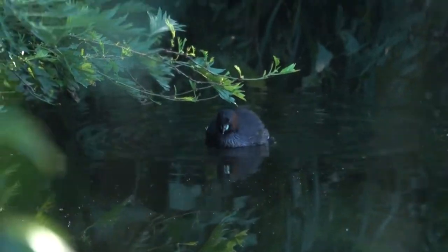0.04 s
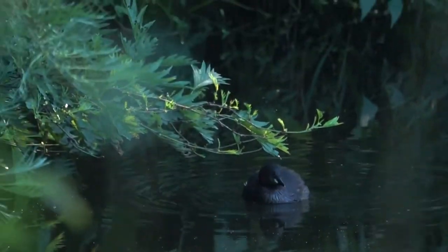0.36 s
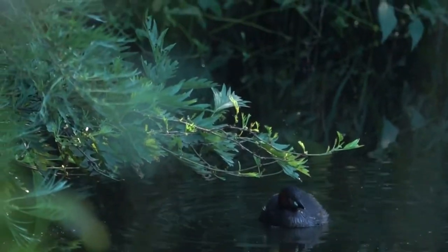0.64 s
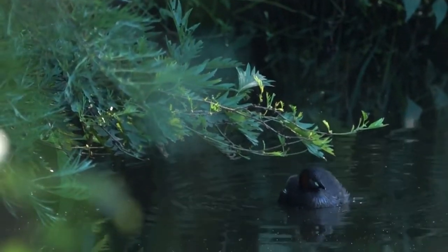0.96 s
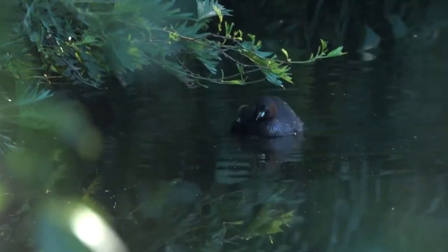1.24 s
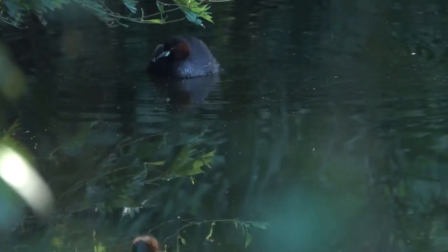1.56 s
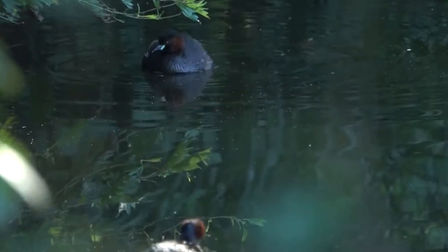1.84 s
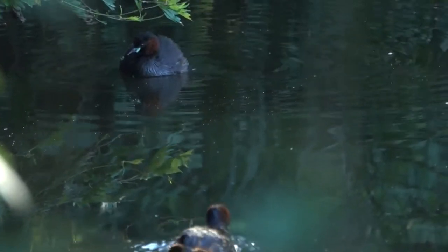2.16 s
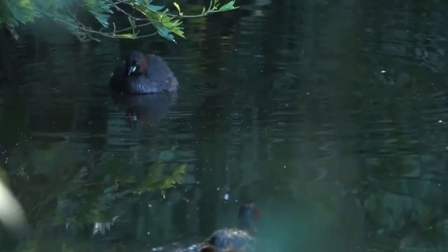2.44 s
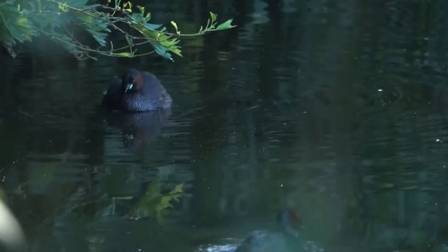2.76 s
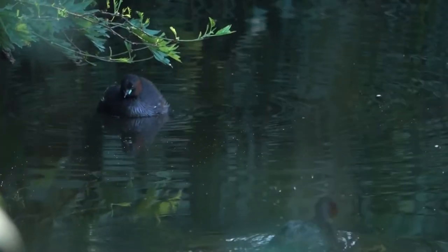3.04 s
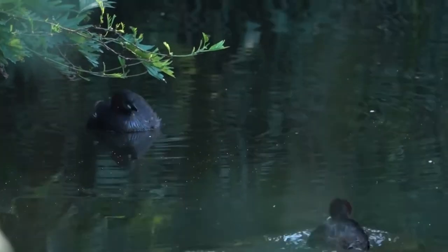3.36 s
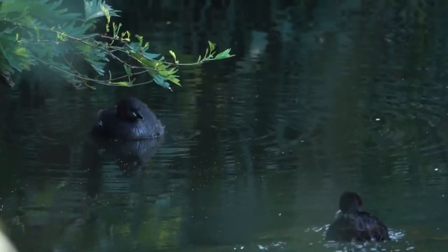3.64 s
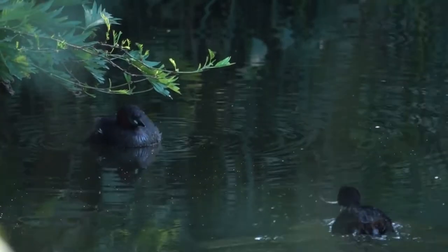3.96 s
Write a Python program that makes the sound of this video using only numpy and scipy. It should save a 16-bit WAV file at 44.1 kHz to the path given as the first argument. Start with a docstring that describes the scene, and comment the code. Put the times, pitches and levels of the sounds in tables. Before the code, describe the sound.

Rapid, shrill trill of a small water bird fading, then thin chirps over soft outdoor rumble.

```python
"""A wooded pond over distant rumble, soft hiss and a faint hum; banks and trees echo every call.
First a little grebe trills: low nasal arches (pulses ringing its throat) alternate with shrill pips
and fade within a second; the water plips at 0.6 s. Thin peeps follow from 1 s. From 1.7 s a farther
bird slurs four notes, stirred water washes softly and a high song starts in the trees.
The rumble swells briefly near the end."""
import sys
import numpy as np
from scipy import signal
from scipy.fft import rfft, irfft
from scipy.io import wavfile
from scipy.ndimage import uniform_filter1d

SR = 44100
rng = np.random.default_rng(int(sys.argv[2]) if len(sys.argv) > 2 else 0)


def unload_audio(sound):
    """Save the sound as a 16-bit wav file, at the path given as the first command line argument."""
    columns = np.transpose(np.atleast_2d(sound))
    # keep every value between -1 and 1, then stretch to whole-number steps
    steps = np.round(np.clip(columns, -1, 1) * 32767)
    wavfile.write(sys.argv[1], SR, steps.astype(np.int16))


N = 176400
T = np.arange(N) / SR
TOP_HZ = 15750


def undb(db):
    """Decibels to gain."""
    return 10 ** (np.asarray(db) / 20)


def on_log(hz, points):
    """Table lookup over log frequency."""
    f, v = np.array(points, float).T
    return np.interp(np.log(np.maximum(hz, 1)), np.log(f), v)


def on_time(points):
    """Table lookup over scene time."""
    return np.interp(T, *np.array(points).T)


def walk(rate_hz, size=N):
    """Smooth random drift, spread near 1."""
    k = max(int(SR / rate_hz), 1)
    steps = np.repeat(rng.standard_normal(size // k + 2), k)
    return np.sqrt(2) * uniform_filter1d(uniform_filter1d(steps, k), k)[:size]


def colour(x, spectrum):
    """Filter by a table of f/Hz, gain/dB."""
    size = x.shape[-1]
    return irfft(rfft(x) * undb(on_log(np.fft.rfftfreq(size, 1 / SR), spectrum)), size)


def noise(spectrum):
    """Coloured noise, rms 1."""
    y = colour(rng.standard_normal(N), spectrum)
    return y / y.std()


def add(track, start_s, sound):
    """Mix a sound into the track."""
    i = int(start_s * SR)
    a, b = max(i, 0), min(i + len(sound), N)
    track[a:b] += sound[a - i:b - i]


def progress(length_s):
    """Ramp 0 to 1 over a note."""
    return np.linspace(0, 1, int(length_s * SR))


def envelope(u, attack, release):
    """Sine attack and release, in shares of the note."""
    rise = np.sin(np.pi / 2 * np.clip(u / attack, 0, 1))
    return rise * np.sin(np.pi / 2 * np.clip((1 - u) / release, 0, 1))


def cycles(hz, jitter):
    """Phase/rad of a tone with relative pitch jitter."""
    return 2 * np.pi * np.cumsum(hz * (1 + jitter * walk(1200, len(hz)))) / SR


def glide(u, turns):
    """Rounded pitch contour."""
    return uniform_filter1d(np.interp(u, *np.array(turns).T), size=len(u) // 6, mode="nearest")


def banks(x, wet_db, pan_db, width):
    """Direct sound, quick scatter off the near bank, long tail from banks and trees."""
    # decay of the wood: f/Hz, T60/s
    wood_t60 = [(500, 0.54), (2500, 1.21), (11000, 1.12), (16000, 0.9)]
    # echo colour: f/Hz, gain/dB
    echo_colour = [(7500, 0.1), (10500, 2.5)]
    early_s, early_db, onset_s = .029, -1.5, .006
    edges_hz = [0, 1000, 2000, 3500, 6000, 9000, 12000, SR / 2]
    t = T[:N // 2]
    hz = np.fft.rfftfreq(len(t), 1 / SR)
    white = rfft(rng.standard_normal((2, len(t))))
    tail = 0
    for lo, hi in zip(edges_hz, edges_hz[1:]):
        band = irfft(white * ((hz >= lo) & (hz < hi)), len(t))
        tail += band * undb(-60 * t / on_log((lo + hi) / 2, wood_t60))
    tail *= (1 + undb(early_db) * np.exp(-t / early_s)) * np.clip(t / onset_s, 0, 1)
    mid, side = tail / np.sqrt((tail ** 2).sum(axis=1, keepdims=True))
    response = colour(np.array([mid + width * side, mid - width * side]), echo_colour)
    echo = signal.fftconvolve(x[None], response, axes=1)[:, :N]
    return x * undb(np.array([[pan_db], [-pan_db]]) / 2) + undb(wet_db) * echo


def air():
    """Steady distant rumble and hiss, wider in the treble."""
    # ambient spectrum: f/Hz, level/dB
    spectrum = [(15, -20), (25, -4.5), (70, .5), (170, -8), (223, -11.5), (476, -15), (911, -16.5),
                (1100, -19), (2550, -40), (4610, -47.5), (7920, -51.5), (16000, -55)]
    # side re mid: f/Hz, gain/dB
    side_gain = [(60, -58), (250, -17), (1200, -6.5), (15000, -2.5)]
    mid = noise(spectrum)
    side = colour(noise(spectrum), side_gain)
    return undb(-45.5 + .5 * walk(6)) * np.array([mid + side, mid - side])


def hum():
    """Faint wavering low tone."""
    # hum level: t/s, level/dB
    levels = [(0, -65), (.7, -54), (4, -56.5)]
    gain = undb(on_time(levels) + 2.94 * walk(9.8))
    hz = 171.6 * (1 + .01198 * walk(12))
    return gain * np.sin(cycles(hz, jitter=.0081))


def rumble():
    """Low noise that swells near the end."""
    # rumble spectrum: f/Hz, level/dB
    spectrum = [(20, -9.5), (60, -3), (120, -14.5), (1000, -76)]
    # swell: t/s, level/dB
    levels = [(0, -54.5), (3.72, -55), (3.86, -43), (4, -59)]
    return noise(spectrum) * undb(on_time(levels))


def wash():
    """Stirred water: slow swells of wide noise."""
    # water spectrum: f/Hz, level/dB
    spectrum = [(1500, -8.5), (2800, -2.5), (5500, -9), (16000, -49)]
    # swells: t/s, level/dB
    levels = [(1.5, -87), (1.8, -68.5), (2.45, -60.5), (2.9, -75.5), (3.6, -69.5), (3.78, -62.5), (4, -69)]
    return np.array([noise(spectrum), noise(spectrum)]) * undb(on_time(levels))


def plip():
    """Quick falling plip on the water."""
    start_s, length_s, from_hz, to_hz = .6, .0091, 1950, 736
    out, u = np.zeros(N), progress(length_s)
    hz = from_hz * (to_hz / from_hz) ** u
    add(out, start_s, undb(-45) * np.sin(np.pi * u) * np.sin(2 * np.pi * np.cumsum(hz) / SR))
    return out


def treetop_song():
    """High falling notes and a blurred warble, mostly echo."""
    # notes: t/s, length/s, from/Hz, to/Hz, level/dB
    high_notes = [(2.62, .044, 8100, 7000, -75), (2.738, .05, 7400, 6800, -67.5),
                  (2.782, 0.039, 6840, 5850, -59), (2.885, 0.06, 6900, 5440, -62.5),
                  (3.01, 0.066, 6640, 5330, -64), (3.2, 0.058, 6200, 5200, -70)]
    # warble: t/s, f/Hz, level/dB
    far_song = [(1.7, 6110, -85), (2.0, 6700, -81), (2.9, 6484, -74.5), (3.12, 6110, -68),
                (3.35, 5880, -79.5), (3.7, 6250, -71.5), (4, 6270, -77)]
    notes = np.zeros(N)
    for start_s, length_s, from_hz, to_hz, db in high_notes:
        u = progress(length_s)
        phase = cycles(from_hz + (to_hz - from_hz) * u, jitter=.022)
        add(notes, start_s, undb(db) * envelope(u, .3, .37) * np.sin(phase))
    times_s, hz, db = np.array(far_song).T
    warble_hz = np.interp(T, times_s, hz) * (1 + .028 * walk(150))
    warble = undb(np.interp(T, times_s, db)) * np.sin(cycles(warble_hz, jitter=.032))
    return (banks(notes, wet_db=2.5, pan_db=-1, width=.64)
            + banks(warble, wet_db=4, pan_db=8, width=.86))


def hoarse(hz):
    """Tone broken up by fast, irregular flutter."""
    return walk(700, len(hz)) * np.sin(cycles(hz, jitter=.06))


def whistler():
    """Farther bird: slurs between a rising and a falling raspy flick, with a hoarse high ending."""
    # whistles: t/s, length/s, f/Hz, level/dB
    slurs = [(1.691, 0.074, 2710, -52), (1.92, 0.082, 2435, -52), (2.147, .078, 2415, -49.5),
             (2.385, 0.081, 2373, -50)]
    # pitch contour: share of note, pitch ratio
    contour = [(0, .96), (.28, 1.0), (.5, .96), (.72, .92), (1, .82)]
    clear, harsh = np.zeros(N), np.zeros(N)
    for start_s, length_s, hz, db in slurs:
        u = progress(length_s)
        phase = cycles(hz * glide(u, contour), jitter=.022)
        tone = np.sin(phase) + undb(-21) * np.sin(2 * phase)
        add(clear, start_s, undb(db + 2.3 * walk(160, len(u))) * envelope(u, .3, .55) * tone)
        u = progress(.0198)
        add(clear, start_s - .016, undb(db - 8.5) * envelope(u, .2, .17) * hoarse(2400 + 1800 * u))
        u = progress(.026)
        add(clear, start_s + .058, undb(-57.5) * envelope(u, .26, .68) * hoarse(4400 - 1400 * u))
        u = progress(.099)
        ending = hoarse(4700 - 650 * u) + undb(-22) * hoarse(9500 - 1100 * u)
        add(harsh, start_s + .04, undb(-66.5) * envelope(u, .23, .23) * ending)
    return (banks(clear, wet_db=-4, pan_db=7, width=1.3)
            + banks(harsh, wet_db=6.5, pan_db=16.5, width=.69))


def peep(u, turns, db, attack):
    """Thin fluttering note, weaker at its highest."""
    fade_db_per_hz, full_hz = .012, 4900
    hz = glide(u, turns)
    thin_db = fade_db_per_hz * np.maximum(hz - full_hz, 0)
    phase = cycles(hz, jitter=.013)
    return undb(db - thin_db + 2 * walk(58, len(u))) * envelope(u, attack, .33) * np.sin(phase)


def peeps():
    """Begging peeps, double-humped or falling."""
    # humped peeps: t/s, length/s, first hump/Hz, second hump/Hz, level/dB
    humped = [(1.055, .085, 4550, 5030, -70), (1.326, .102, 4650, 5250, -67),
              (1.523, 0.1, 4640, 5320, -64.5), (1.802, .08, 4700, 5250, -64), (2.002, .09, 4940, 5370, -64),
              (2.225, 0.099, 4800, 5200, -67), (2.552, .096, 4600, 5580, -63),
              (2.76, .1, 4970, 6200, -63.5), (2.996, .096, 4750, 5100, -65),
              (3.348, 0.087, 4400, 5340, -67), (3.575, 0.08, 4970, 6060, -67.5),
              (3.919, .1, 4380, 5350, -65.5)]
    # their turning points: share of note
    turn_shares = [0, .2, .37, .61, 1]
    # falling peeps: t/s, length/s, top/Hz, crest as share of note, level/dB
    falls = [(2.466, 0.068, 5650, .5, -58), (2.661, 0.083, 5290, 0.44, -60.5),
             (2.971, 0.072, 5900, 0.58, -59), (3.19, .064, 4800, .22, -61.5), (3.49, .09, 5200, 0.33, -63),
             (3.724, 0.078, 4650, 0.2, -60)]
    # their contour: start/Hz, shoulder/Hz, end/Hz
    fall_hz = (4090, 4340, 3480)
    out = np.zeros(N)
    for start_s, length_s, first_hz, second_hz, db in humped:
        turns = list(zip(turn_shares, [.73 * first_hz, first_hz, .92 * first_hz, second_hz, 3370]))
        add(out, start_s, peep(progress(length_s), turns, db, attack=.3))
    start_hz, shoulder_hz, end_hz = fall_hz
    for start_s, length_s, top_hz, crest, db in falls:
        u, shoulder = progress(length_s), (1 + crest) / 2
        turns = [(0, start_hz), (crest, top_hz), (shoulder, shoulder_hz), (1, end_hz)]
        swell_db = -20 * np.clip(shoulder - u, 0, .5)
        add(out, start_s, peep(u, turns, db + swell_db, attack=.18))
    return banks(out, wet_db=-6.5, pan_db=4.5, width=.67)


def arch(length_s, top_hz):
    """Nasal rise and fall: syrinx pulses, third harmonic leading, ring the throat."""
    # throat resonances: f/Hz, gain/dB
    throat = [(850, -6.5), (1350, -10.5), (1800, -11.5), (2300, -7.5), (2780, -4), (3050, -8.5),
              (3500, -16), (3850, -8.5), (4200, -4), (4700, -21), (6300, -21.5), (7600, -38.5)]
    sag, third_db = .2515, 5
    u = progress(length_s)
    hz = top_hz * (1 - sag * (2 * u - 1) ** 2)
    phase = cycles(hz, jitter=.012)
    pulses = sum((k * hz < TOP_HZ) * undb(third_db * (k == 3)) * np.cos(k * phase) for k in range(1, 20))
    cepstrum = irfft(np.log(undb(on_log(np.fft.rfftfreq(512, 1 / SR), throat))))
    ring = irfft(np.exp(rfft(np.r_[cepstrum[0], 2 * cepstrum[1:256]], 512)))  # minimum phase
    return -envelope(u, .3, .27) * signal.lfilter(ring, 1, pulses)


def rasp(length_s, pip_hz, breath):
    """Breathy upward scoop whose harmonics sweep the throat resonances."""
    # harmonics 1-7: level/dB
    harmonics = [-10, -7.5, -10, 3, -4.5, -3, -7]
    # throat resonances: f/Hz, gain/dB
    throat = [(1150, -13.5), (1600, 1.5), (2400, -6), (3150, -11), (3500, -2), (4100, 4), (4900, -17.5)]
    from_ratio, to_ratio, flutter_db = .14, .325, .5
    u = progress(length_s)
    hz = pip_hz * (from_ratio + (to_ratio - from_ratio) * np.sin(np.pi / 2 * u))
    phase = cycles(hz, jitter=.0098)
    voice = sum(undb(db + on_log(k * hz, throat) + flutter_db * walk(370, len(u))) * np.sin(k * phase)
                for k, db in enumerate(harmonics, 1))
    return envelope(u, .82, .2) * (undb(-4.5) * voice + undb(-32) * breath[:len(u)])


def pip(length_s, hz, db, bright_db):
    """Shrill, slightly bowed tone; softer pips are more nasal."""
    # harmonics 2-6: level/dB re fundamental, slope/(dB per dB of pip level)
    overtones = [(-10.5, -1.3), (-23, -1.1), (-22, -0.63), (-19, 0.57), (-27.5, -1.2)]
    rise, bow, full_db = .008, .008, -30.5
    u = progress(length_s)
    bend = 1 + rise * (u - .5) + bow * (1 / 3 - (2 * u - 1) ** 2)
    phase = cycles(hz * bend, jitter=.0078)
    tone = np.cos(phase)
    for k, (base_db, slope) in enumerate(overtones, 2):
        overtone_db = base_db + slope * (db - full_db) + bright_db * (k > 2)
        tone += undb(overtone_db + 1.46 * walk(100, len(u))) * np.cos(k * phase)
    return -undb(db) * envelope(u, .12, .45) * tone


def grebe():
    """Trill: each arch is followed by a rising rasp that breaks into a pip."""
    # nasal arches: t/s, length/s, top/Hz, level/dB
    arches = [(-.004, 0.031, 1010, -33.5), (.07, 0.032, 1001, -34.5), (0.144, .033, 963, -35),
              (0.211, .03, 993, -34), (.288, 0.035, 944, -35), (.362, .029, 983, -35),
              (.436, 0.026, 915, -36.5), (.486, 0.0283, 961, -37), (0.561, 0.021, 839, -38.5),
              (.638, 0.022, 792, -43), (0.71, .019, 738, -48)]
    # shrill pips: t/s, length/s, f/Hz, level/dB, boost of harmonics 3-6/dB
    pips = [(.03, 0.025, 2524, -31, -1), (.108, 0.02, 2554, -32.5, 1.5), (0.183, 0.015, 2600, -32.5, -1),
            (0.255, 0.013, 2606, -31.5, -3.5), (0.329, 0.014, 2640, -31, -3),
            (0.404, 0.011, 2642, -31, 2.5), (.478, .012, 2602, -31.5, 3.5), (.524, .014, 2535, -33, -5.5),
            (0.6, 0.017, 2474, -35.5, -4), (0.672, .018, 2486, -36, -2), (.754, .011, 2524, -34.5, -5),
            (.835, .014, 2404, -37.5, -5)]
    # air in the rasp: f/Hz, level/dB
    breath_spectrum = [(2000, -8), (5000, 0), (9000, -1), (14500, -1)]
    rasp_s, overlap_s = .017, .003
    out, hiss = np.zeros(N), noise(breath_spectrum)
    for start_s, length_s, top_hz, db in arches:
        add(out, start_s, undb(db) * arch(length_s, top_hz))
    for start_s, length_s, hz, db, bright_db in pips:
        breath = hiss[int(start_s * SR):]
        add(out, start_s - rasp_s + overlap_s, undb(db) * rasp(rasp_s, hz, breath))
        add(out, start_s, pip(length_s, hz, db, bright_db))
    return banks(out, wet_db=-6.5, pan_db=2.2, width=.56)


def scene():
    """Water, birds and background in stereo."""
    return wash() + grebe() + peeps() + whistler() + treetop_song() + plip() + air() + hum() + rumble()


def record(dry):
    """Steep low-pass at TOP_HZ."""
    return signal.sosfilt(signal.ellip(10, .1, 70, TOP_HZ, fs=SR, output="sos"), dry)


dry = scene()
out = record(dry)
unload_audio(out)
```